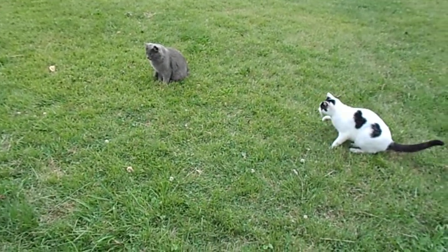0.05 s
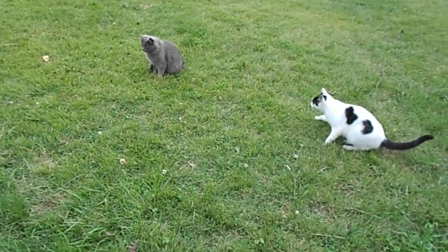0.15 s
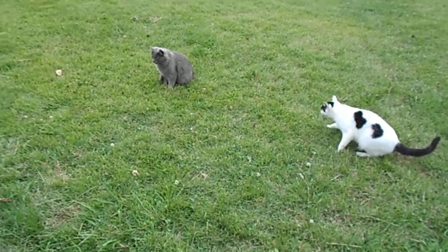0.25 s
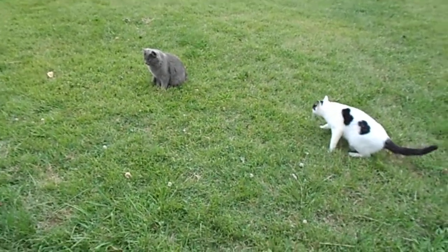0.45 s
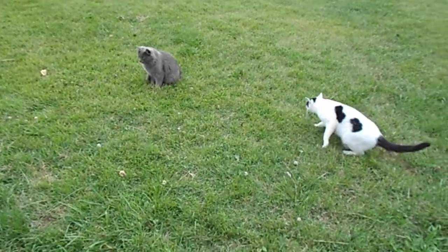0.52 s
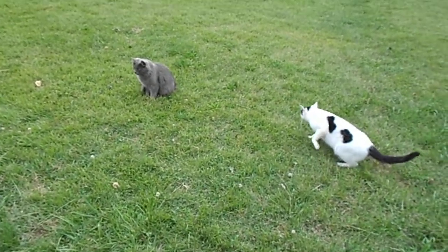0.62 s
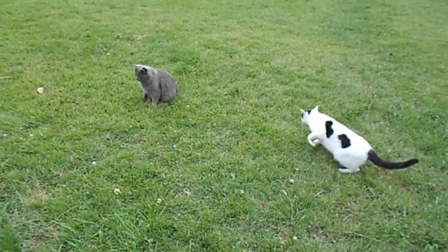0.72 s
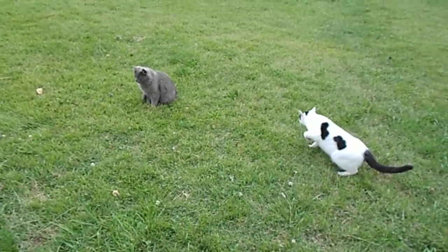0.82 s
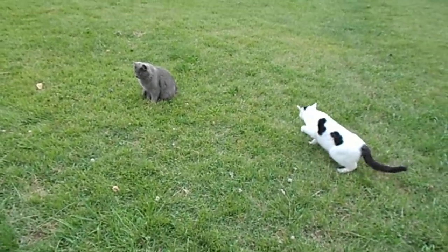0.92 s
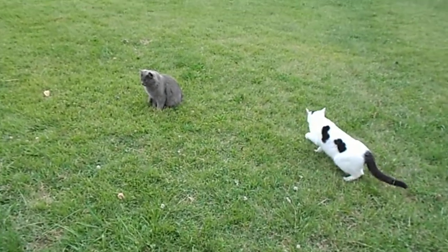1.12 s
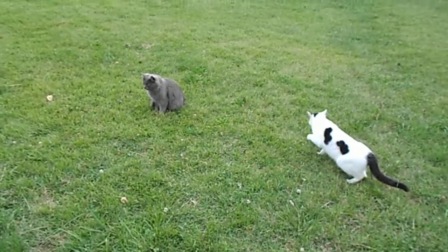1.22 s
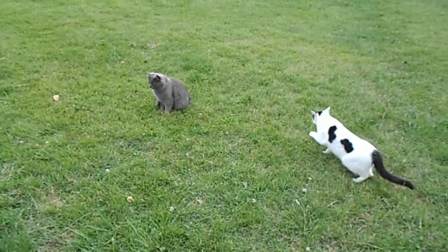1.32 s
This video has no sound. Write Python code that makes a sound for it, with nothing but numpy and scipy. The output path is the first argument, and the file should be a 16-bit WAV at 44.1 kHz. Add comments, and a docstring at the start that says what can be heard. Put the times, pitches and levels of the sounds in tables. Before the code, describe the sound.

A cat spits one short, sharp hiss outdoors while crickets chirp faintly.

```python
"""On a lawn two cats face off. One spits a single sharp hiss, a turbulent jet shaped by the mouth and
carried on a low puff of air. A small click and a faint hiss follow; later a paw lands in the grass.
Two crickets chirp in turn by stridulation, over a distant insect chorus, a soft wash of air and traffic
and the low hum of a motor. The camera's gain control ducks everything after the hiss, then recovers."""
import sys
import numpy as np
from scipy.fft import rfft, irfft, next_fast_len
from scipy.io import wavfile
from scipy.ndimage import uniform_filter1d, minimum_filter1d, map_coordinates

SR = 44100
rng = np.random.default_rng(int(sys.argv[2]) if len(sys.argv) > 2 else 0)


def transcribe(u):
    """Save the signal u as a 16-bit wav file named by the first command-line argument.

    u: samples, shape (n,) or (channels, n), limited to [-1, 1]; the rate is SR.
    q: integer samples, one column per channel.
    """
    v = np.clip(np.atleast_2d(u).T, -1, 1)
    q = np.round(v * 32767).astype(np.int16)
    wavfile.write(sys.argv[1], SR, q)


N = 59535


def amp(db):
    return 10 ** (np.asarray(db) / 20)


def unit(x):
    return x / np.sqrt(np.mean(x ** 2) + 1e-20)


def clock():
    return np.arange(N) / SR


def curve(rows):
    """Linear interpolation of (t/s, value) points, one value a sample."""
    return np.interp(clock(), *np.transpose(rows))


def wobble(rate):
    """Smooth random modulation: a spline through `rate` Gaussian knots a second."""
    return map_coordinates(rng.standard_normal(int(N * rate / SR) + 4), [clock() * rate])


def filtered(x, response):
    """Zero-phase filtering: the spectrum of x times a function of frequency."""
    size = next_fast_len(N + 8192)
    return irfft(rfft(x, size) * response(np.fft.rfftfreq(size, 1 / SR)), size)[:N]


def noise(spectrum):
    """Gaussian noise of rms 1, its spectral density shaped by (f/Hz, level/dB) points."""
    f, db = np.transpose(spectrum)
    colour = lambda hz: amp(np.interp(np.log(hz + 1), np.log(f), db))
    return unit(filtered(rng.standard_normal(N), colour))


def burst(start, rise, t60):
    """Envelope of a damped impact: a quick rise and an exponential decay."""
    t = np.maximum(clock() - start, 0)
    return (1 - np.exp(-t / rise)) * np.exp(-np.log(1000) * t / t60)


def swell(middle, width):
    """Gaussian envelope: a soft rise and fall."""
    return np.exp(-.5 * ((clock() - middle) / width) ** 2)


def spit(peak_s=.2529, hold_s=.013, peak_db=4, rise_db_per_s=1722, fall_db_per_s=1121.5):
    """Source and filter: a brief turbulent jet at the teeth excites the resonances of the mouth."""
    # spectrum of the jet: f/Hz, level/dB
    jet = [(60, -24.5), (170, -27.5), (300, -20), (520, -17.5), (1000, -13), (1400, -11.5), (2300, -6.5),
           (3100, -9), (4200, -5), (5500, -5.5), (6500, -3), (8200, -2), (9200, -3), (10200, -1),
           (10900, -13), (11900, -19.5), (12700, -41), (15800, -64)]
    # resonances of the mouth: f/Hz, bandwidth/Hz, gain/dB
    formants = [(2200, 400, -1), (4180, 90, 4.5), (4635, 200, 2), (6560, 400, 1.5), (9000, 2900, 3.5)]
    mouth = lambda hz: amp(sum(db / (1 + (2 * (hz - f) / width) ** 2) for f, width, db in formants))
    t = clock() - peak_s
    force_db = rise_db_per_s * np.minimum(t, 0) - fall_db_per_s * np.maximum(t - hold_s, 0)
    return unit(filtered(noise(jet), mouth)) * amp(peak_db + force_db + .5 * wobble(800))


def puff(level_db=-21):
    """Flow noise: the push of air that carries the spit, lower and rounder than its hiss."""
    # spectrum of the airflow: f/Hz, level/dB
    airflow = [(30, -5.5), (65, 4.5), (130, -12), (230, -3.5), (360, 3), (560, -5.5), (800, 0.5),
               (1500, -7), (3000, -8), (12000, -69)]
    return amp(level_db) * noise(airflow) * swell(middle=.2644, width=.017)


def click(rise_s=.0002, crack_db=4.5, crack_t60_s=.007, cutoff_hz=11500):
    """Impulse response: each click is a broadband crack and damped modes that die in milliseconds."""
    # a faint tick, then a sharp click: t/s, level/dB
    impulses = [(0.3158, -28.5), (0.3182, -14.5)]
    # modes from dull body to snap: f/Hz, level/dB, T60/s
    modes = [(190, -10, 0.035), (520, -5.5, .016), (950, -8.5, 0.021), (1460, -10, 0.01),
             (2150, -12.5, 0.011), (4300, -5, 0.0065), (7380, 1, .006)]
    # spectrum of the crack: f/Hz, level/dB
    snap = [(200, 3), (1500, -4), (3100, -18), (4200, -2), (6300, -3), (7600, -7), (10000, -10),
            (11500, -18), (13000, -70)]
    mode = lambda s, hz, t60: burst(s, rise_s, t60) * np.sin(2 * np.pi * (hz * clock() + rng.random()))
    ring = sum(amp(db + level) * mode(s, hz, t60) for s, db in impulses for hz, level, t60 in modes)
    crack = noise(snap) * sum(amp(db + crack_db) * burst(s, rise_s, crack_t60_s) for s, db in impulses)
    return filtered(ring + crack, lambda hz: 1 / (1 + (hz / cutoff_hz) ** 30))


def trailing_hiss(middle_s=.341, level_db=-41, whistle_hz=6300, sag_hz_per_s=30000, whistle_db=-8):
    """A glide in noise: a thin whistle sinks through a faint puff."""
    # spectrum of the hiss: f/Hz, level/dB
    hiss = [(300, 0.5), (2200, -6), (3600, -12), (4800, -3), (6500, -1.5), (8200, -1.5), (9300, -14),
            (10300, -2), (11600, -22), (12600, -70)]
    pitch = whistle_hz - sag_hz_per_s * (clock() - middle_s) + 120 * wobble(400)
    whistle = unit(np.sin(2 * np.pi * np.cumsum(pitch) / SR))
    return amp(level_db) * swell(middle_s, width=.017) * (noise(hiss) + amp(whistle_db) * whistle)


def paw_step(start_s=.97, pat_db=-31.5, rustle_db=-41.5, lag_s=.0049):
    """Damped impact: a paw pats the ground, and the blades crackle as they bend just after it."""
    # spectrum of the pat: f/Hz, level/dB
    ground = [(80, 7.5), (300, -4), (550, 6), (1000, -4), (2000, -5.5), (6000, -35), (12000, -70)]
    # spectrum of the bending grass: f/Hz, level/dB
    grass = [(300, -9), (550, 18), (900, -14), (2200, -4), (4500, -1), (7000, -3), (9700, 4.5),
             (11500, -15), (12800, -70)]
    crackle = unit(noise(grass) * amp(2 * wobble(700)))
    pat = amp(pat_db) * noise(ground) * burst(start_s, rise=.001, t60=.032)
    return pat + amp(rustle_db) * crackle * swell(start_s + lag_s, width=.0075)


def crickets(swell_db=4.5, waver_hz=79, rough_db=2.5):
    """Stridulation: a chirp is a swelling run of wing strokes, each a tone that sags in pitch."""
    # t/s, length/s, end level/dB, f/Hz, stroke rate/Hz, sag in a stroke/Hz, sounding share of a stroke
    chirps = [(-.031, .09, -41.5, 7650, 97, 400, 0.53), (.058, .085, -34.5, 7910, 106, 130, .85),
              (.3345, .06, -46, 7660, 98, 410, .6), (.4965, .075, -31.5, 7914, 107, 130, .85),
              (0.654, .08, -39.5, 7660, 103, 300, 0.66), (0.926, .085, -33, 7920, 120, 128.8, .85),
              (1.01, .05, -38, 7660, 101, 400, 0.55), (1.321, .06, -44, 7500, 100, 400, .6)]
    out = np.zeros(N)
    for start, length, db, hz, rate, sag_hz, share in chirps:
        strokes = (clock() - start) * rate
        total = np.round(length * rate)
        along = np.clip(strokes % 1 / share, 0, 1)  # 0 to 1 while a stroke sounds
        gate = np.sqrt(np.abs(np.sin(np.pi * along))) * (strokes > 0) * (strokes < total)
        pitch = hz - sag_hz * (along - .5) + waver_hz * wobble(700)
        level_db = db - swell_db * (1 - np.clip(strokes / total, 0, 1)) + rough_db * wobble(700)
        out += gate * amp(level_db) * np.sin(2 * np.pi * np.cumsum(pitch) / SR)
    return out


def insect_chorus(level_db=-52, flutter_db=2):
    """Incoherent sources: many far insects blur into a fluttering band of noise."""
    # spectrum of the chorus: f/Hz, level/dB
    band = [(4000, -77), (6900, -18.5), (7400, 1), (7900, 0), (8400, -3.5), (8900, -21.5), (12000, -67.5)]
    return amp(level_db) * unit(noise(band) * amp(flutter_db * wobble(200)))


def moving_air():
    """Turbulence: open air makes a broadband noise that slowly rises and falls."""
    # spectrum of the air: f/Hz, level/dB
    spectrum = [(25, 4), (90, 0), (180, -5), (400, -8.5), (700, -10), (1200, -18), (2000, -20),
                (3500, -19.5), (6000, -20), (9000, -19), (10300, -25.5), (11200, -40.5), (11900, -40.5),
                (12700, -81.5)]
    # its strength: t/s, level/dB
    levels = [(0, -45), (.2, -47.5), (.42, -46.5), (.62, -42.5), (.88, -47.5), (1.12, -43), (1.35, -46.5)]
    return noise(spectrum) * amp(curve(levels))


def traffic(drift_db=1.96):
    """Incoherent sources: distant traffic merges into a swelling midrange wash."""
    # spectrum of the wash: f/Hz, level/dB
    spectrum = [(400, -37.5), (750, -11.5), (980, 0.5), (1300, -0.5), (1700, -8), (2800, -17.5),
                (6000, -29), (12000, -83.5)]
    # its strength: t/s, level/dB
    levels = [(0, -49), (.2, -52), (.65, -48), (.88, -50), (1.09, -44), (1.22, -46.5), (1.35, -43.5)]
    return noise(spectrum) * amp(curve(levels) + drift_db * wobble(20))


def motor_hum(hum_hz=68.1, waver_hz=2, waver_db=.96):
    """Harmonic vibration: a far motor radiates an unsteady low tone and its octave."""
    # strength of the hum: t/s, fundamental level/dB, octave level/dB
    levels = [(0, -47.5, -47.5), (.2, -47.5, -57), (.4, -45.5, -51.5), (.55, -52, -52.5), (.68, -44.5, -58),
              (.81, -59.5, -49), (.95, -49.5, -50.5), (1.03, -52.5, -71), (1.15, -40, -46),
              (1.25, -50, -59.5), (1.33, -42.5, -59)]
    times, *harmonics = np.transpose(levels)
    phase = 2 * np.pi * np.cumsum(hum_hz + waver_hz * wobble(16)) / SR
    return sum(unit(np.sin(k * phase)) * amp(np.interp(clock(), times, db) + waver_db * wobble(16))
               for k, db in enumerate(harmonics, 1))


def scene():
    """Superposition: the cats, the insects and the background add in one channel."""
    cats = spit() + puff() + click() + trailing_hiss() + paw_step()
    return (cats + crickets() + insect_chorus() + moving_air() + traffic() + motor_hum())[None]


def record(dry):
    """Automatic gain control ducks at once, holds and recovers; saturation and a low-pass follow."""
    limit_db, sense_s, hold_s, recover_s = -7.5, .004, .18, .066
    bass_hz, bass_share = 160, .61  # deep bass gets only this share of the reduction in dB
    ceiling, top_hz = .84, 15800
    x, = dry
    power = np.abs(uniform_filter1d(x ** 2, int(sense_s * SR)))
    over_db = np.maximum(10 * np.log10(power + 1e-12) - limit_db, 0)
    half = int(hold_s * SR / 2)
    held_db = -minimum_filter1d(-over_db, 2 * half + 1, origin=half, mode="constant")  # peak hold
    fade = np.exp(-clock() / recover_s)
    duck_db = np.maximum.accumulate(held_db / fade) * fade  # exponential release
    bass = filtered(x, lambda hz: 1 / (1 + (hz / bass_hz) ** 8))
    ducked = (x - bass) * amp(-duck_db) + bass * amp(-bass_share * duck_db)
    rounded = ducked / (1 + (ducked / ceiling) ** 8) ** (1 / 8)
    return filtered(rounded, lambda hz: np.clip((top_hz - hz) / 300 + .5, 0, 1))[None]


dry = scene()
out = record(dry)
transcribe(out)
```